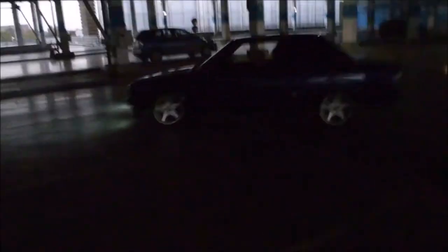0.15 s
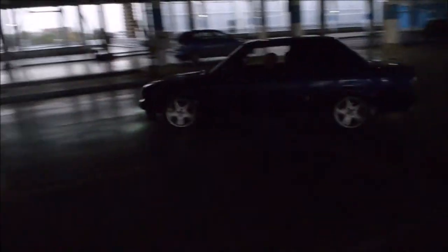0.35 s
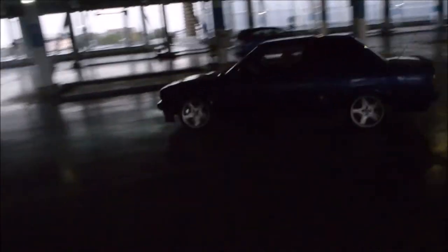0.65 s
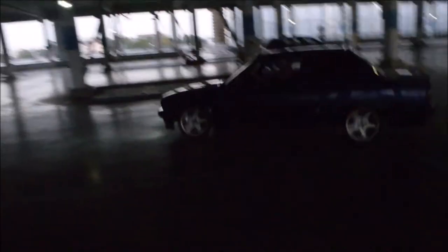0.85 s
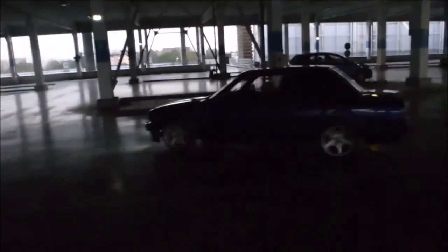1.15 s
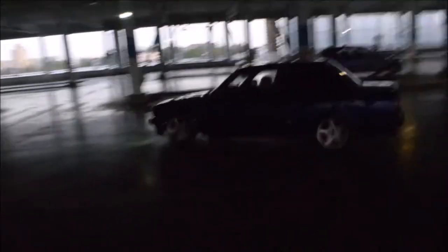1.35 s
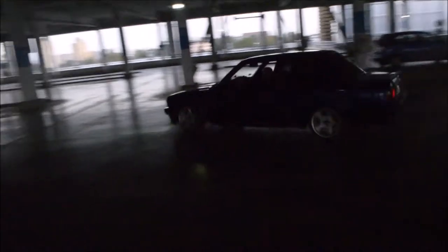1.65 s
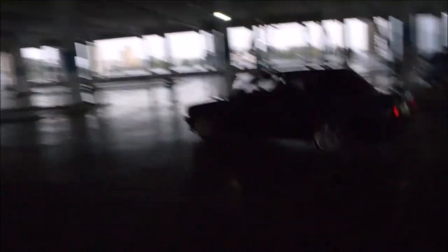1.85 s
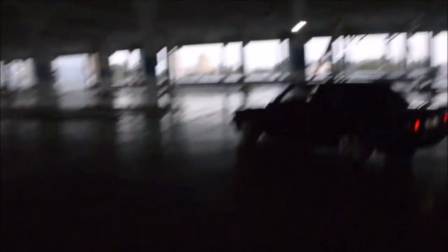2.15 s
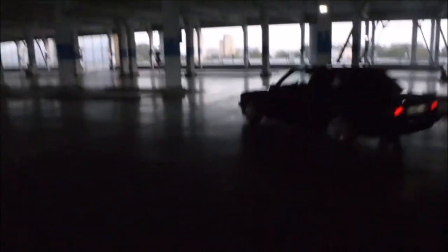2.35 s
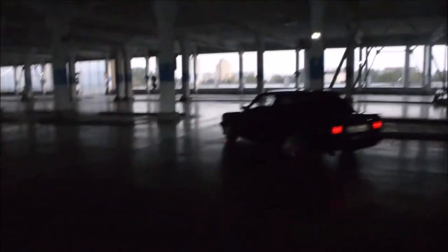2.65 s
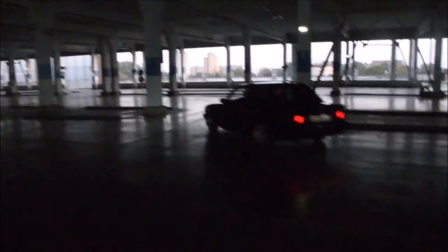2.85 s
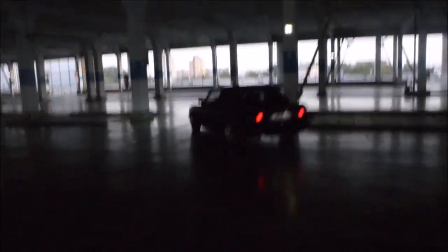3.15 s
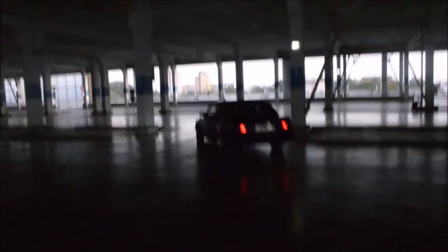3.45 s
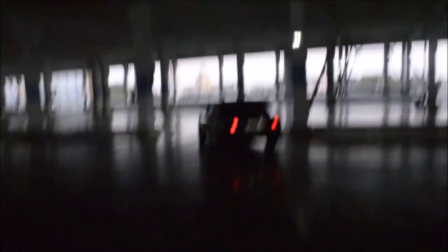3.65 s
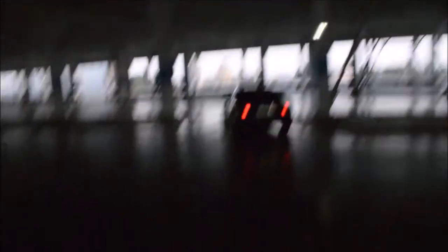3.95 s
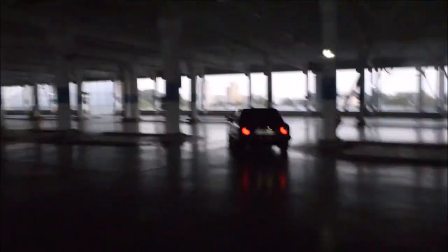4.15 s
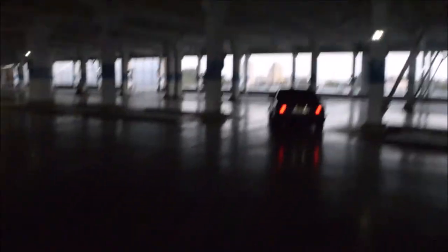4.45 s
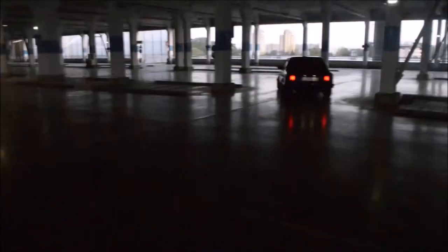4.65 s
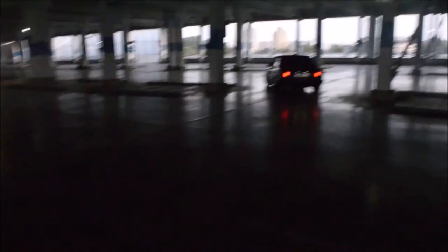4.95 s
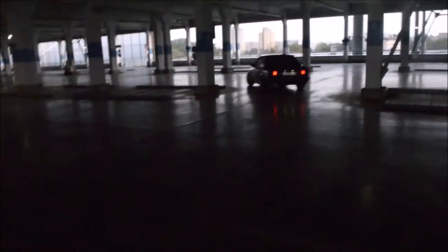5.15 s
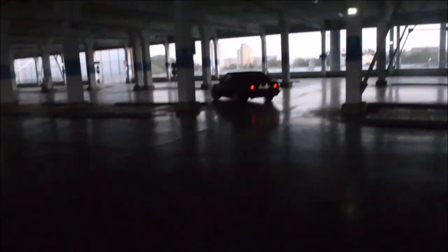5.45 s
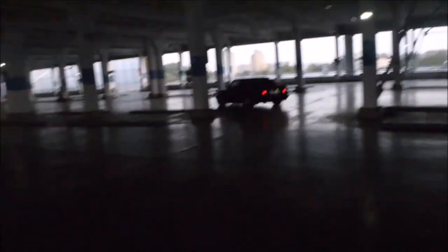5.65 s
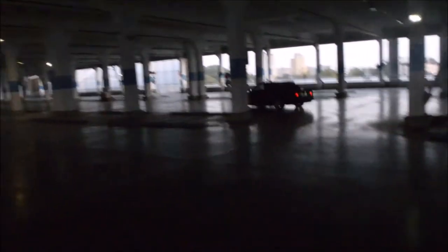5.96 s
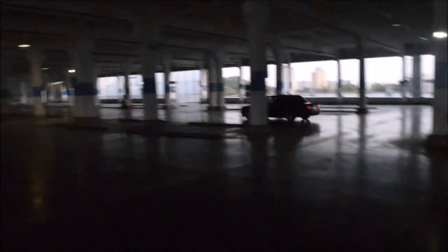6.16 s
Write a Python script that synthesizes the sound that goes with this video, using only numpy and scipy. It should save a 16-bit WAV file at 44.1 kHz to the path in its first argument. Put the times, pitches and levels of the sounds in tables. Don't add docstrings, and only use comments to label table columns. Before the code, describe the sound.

Low uneven engine drone and tyre hiss in a hollow garage, small grit cracks nearby, then a loud rising rev that peaks, dips and holds.

```python
import sys
import numpy as np
from scipy import signal
from scipy.fft import rfft, irfft, next_fast_len
from scipy.io import wavfile
from scipy.ndimage import uniform_filter1d, map_coordinates

SR = 44100
rng = np.random.default_rng(int(sys.argv[2]) if len(sys.argv) > 2 else 0)


def makeup_ratio(level_db):
    decades = np.asarray(level_db, float) / 20
    return 10 ** decades


def transcribe(u):
    v = np.clip(np.atleast_2d(u).T, -1, 1)
    q = np.round(v * 32767).astype(np.int16)
    wavfile.write(sys.argv[1], SR, q)


N = 277826
T = np.arange(N) / SR

# (time [s], crank speed [Hz])
CRANK = [(0, 16.7), (.3, 17.2), (.75, 18.2), (1.3, 19.9), (2, 21.35), (3.5, 21.6), (4.3, 23.1), (4.7, 25.7),
         (4.9, 30.2), (5.01, 36.5), (5.2, 55.2), (5.39, 75), (5.46, 89), (5.56, 102), (5.69, 114.3),
         (5.96, 115), (6.075, 99.5), (6.3, 98.5)]
# (time [s], clean drone [dB], gas throb [dB])
EFFORT = [(0, -23.5, -12.5), (.4, -30.5, -27), (.8, -20.5, -18), (1.35, -25.5, -18), (1.9, -22, -23.5),
          (2.7, -24.5, -23.5), (3.3, -24, -25.5), (3.8, -27, -21.5), (4.35, -21.5, -22), (4.68, -8, -16.5),
          (4.88, -13, -12), (5.2, -13, -19), (5.37, -12.5, -15.5), (5.43, -31, -15.5), (5.52, -16.5, -8.5),
          (5.8, -16, -14.5), (6.15, -16.5, -12), (6.3, -17, -13)]
ORDERS = (2, 3, 4, 5, 6, 7, 8, 10)
SHUT_DB = (-20.5, -23.5, -2, -2, 0, 0, -9, -13)
OPEN_DB = (-0.3, -12.5, -5, -16, -21.5, -36, -21, -38)
# (frequency [Hz], level [dB])
SILENCER = [(50, -19.5), (88, -10.5), (104, -2.5), (127, 3), (150, -3.5), (172, -1), (225, -1.65),
            (450, -18.5)]
# (time [s], level [dB], half length [s])
LIFTS = [
    (2.692, 0.5, .07),
    (5.972, -7, 0.016),
    (6.185, -11, 0.05),
]
# (time [s], level [dB], half length [s])
STANDING_WAVES = [
    [(4.55, -12.5, .15), (4.9, 7, 0.11), (5.08, 6, 0.05), (5.3, -2, 0.042), (5.68, 4, 0.084),
     (5.93, 7.5, 0.036), (6.24, 2, .025)],
    [(5.046, 6.04, .07)],
    [(.9, 10, 0.21), (4.47, 10, 0.098), (4.82, 2, 0.046), (5.01, -10.5, 0.017), (5.93, -7.5, 0.055),
     (6.07, -3, 0.029)],
    [(1.35, 4, 0.53), (2.76, -17, 0.065), (3.65, -14, 0.092), (4.02, 8.5, 0.093), (4.66, 4.5, 0.16),
     (4.97, 11, 0.046)],
    [(.6, -10, .2), (1.4, -16, 0.1), (1.95, 2, 0.088), (2.8, -5, .25), (4.15, -13.5, 0.33)],
    [(.1, -5.5, 0.05), (.35, -9, 0.053), (2.02, -12.5, 0.32), (4.2, -14, 0.29)],
    [(1.6, 9.5, 0.13), (2.02, -12, 0.089), (2.43, 5, 0.1), (3.05, -10, 0.063), (3.4, 5.5, 0.15),
     (4.72, 14, 0.14)],
    [(.2, 10, 0.72), (.85, -6.5, 0.22), (2.68, -11, .07), (2.95, 6, 0.073), (3.55, -9.5, .22)],
]
# (frequency [Hz], noise density [dB])
SHUT_PIPE = [(18, -60), (30, -29), (55, -10), (80, -13), (100, -2.5), (125, -2), (150, -6.5), (190, -9),
             (225, -10), (250, -13), (278, -8.5), (320, -18), (370, -21), (450, -30), (800, -31.5),
             (1700, -120)]
# (frequency [Hz], noise density [dB])
OPEN_PIPE = [(18, -67), (30, -32.5), (49, -35), (114, -3.5), (173, 0.5), (211, -2.5), (230, -6.5),
             (280, -11.5), (328, -11.5), (411, -14), (502, -18.5), (900, -21.5), (1170, -52.5),
             (1980, -120)]
# (frequency [Hz], time to fall 60 dB [s])
HALL_DECAY = [(60, 0.94), (300, 1.81), (1500, 0.28), (6000, 0.54)]
# (time [s], roar [dB])
SCRUB = [(0, -30), (.15, -33), (.9, -33.5), (1.27, -31.5), (2.4, -33), (4.5, -34), (4.85, -34.5),
         (4.97, -33.5), (5.25, -38), (5.42, -35), (5.49, -30), (5.55, -29), (6.1, -26), (6.3, -29.5)]
# (frequency [Hz], noise density [dB])
TYRE = [(200, -37), (350, -6), (520, -6.5), (680, -7), (960, -1), (1300, -5.5), (1700, -9), (2000, -10.5),
        (2600, -17), (3300, -24.5), (4200, -36), (6000, -51.5), (9000, -87.5)]
# (frequency [Hz], noise density [dB])
RASP = [(200, -35.5), (350, 10), (480, -6), (670, -1), (1070, -7.5), (1900, -24.5), (3100, -19.5),
        (3700, -42.5), (5500, -39.5), (7000, -43.5), (12000, -66)]
# (frequency [Hz], noise density [dB])
AIR = [(2000, -36.5), (3300, -4), (4200, -8.5), (5200, -13.5), (7000, -18), (9000, -21.5), (12000, -24.5),
       (14000, -35), (15700, -34), (16200, -88)]
# (time [s], level [dB], extra treble [dB], half length [s])
SPRAY = [(.05, 3, -3.5, 0.14), (0.303, -6.5, 8, 0.077), (.72, -1.5, 8, .07), (2.092, 6, -4.5, 0.079),
         (4.05, 2.5, 4.5, .05), (4.454, 1, -11.5, 0.071), (4.627, 10, -5, 0.25), (4.933, 9, -1, .1),
         (5.178, 10, 1.5, 0.16), (5.41, 0, 3, .08), (5.548, -2, 7, .08), (5.948, 5, -7.5, 0.27)]
# (time [s],
# frequency [Hz], width [Hz], level [dB], half length [s])
SQUEAKS = [(2.127, 5200, 150, -60, .015), (3.2, 966, 75, -40, 0.81), (1.18, 1010, 53, -42.5, 0.39),
           (2.85, 1860, 60, -50, 0.27), (4.866, 4480, 130, -51, .008), (4.87, 4500, 120, -55, 0.035),
           (4.96, 197, 9, -21, .04), (.925, 4700, 90, -56, .012), (.15, 4750, 90, -56, .012),
           (0.38, 4750, 90, -64, 0.018), (1.78, 4200, 90, -61, .02), (5.88, 5600, 800, -56, 0.11),
           (6.05, 6100, 900, -62, 0.076), (6.14, 210, 6.3, -14.5, 0.058), (0.43, 219, 14, -31.5, 0.31)]
# (frequency [Hz], level [dB])
WHINE = [(15665, -78.5)]
# (time [s], peak [dB], hollow [dB], treble [dB], time to fall 60 dB [s])
SNAPS = [(0.1615, -22, -15, 4, 0.0047), (0.1658, -10, 10.5, -4, 0.036), (0.175, -17.5, 4, 6, 0.007),
         (0.1772, -2.5, 3, -13, 0.0076), (0.1798, -15.5, 6, -21, 0.045), (0.928, -23.5, -10.5, -30, 0.022),
         (0.9351, -7.5, -5.5, -32, 0.0052), (1.081, -17.5, 3, -19, 0.0054), (4.574, -27, -6, -2, 0.0048),
         (5.179, -29, 8, 2, .004), (5.209, -40, -10.5, -1, 0.0048)]
# (time [s], frequency [Hz], level [dB], time to fall 60 dB [s])
TINKLE = [
    (.184, 3408, -37, 0.37),
    (.168, 6720, -50, 0.2),
    (0.148, 4800, -50, 0.089),
]
# (frequency [Hz], width [Hz], level [dB])
HOLLOW = [(547, 230, -4), (1230, 170, 7)]
# (frequency [Hz], width [Hz], level [dB])
SHELL = [(2630, 930, 3.5), (3560, 2300, -10)]
# (frequency [Hz], width [Hz], level [dB])
GRIT_EDGE = [(6800, 2000, -4), (10000, 3000, -13)]
HOLES = [.07, .152, .349, .39, .925, 1.24, 1.327, 1.751, 1.761, 1.771, 1.841, 2.029, 2.204, 2.329, 2.522,
         2.585, 2.841, 3.399, 3.569, 3.907, 3.952, 3.993, 4.422, 4.655, 4.85, 5.059, 5.51, 6.193]
# (time [s], peak [dB])
TICKS = [(4.6747, -60), (4.6773, -55), (4.9698, -50.5), (4.9973, -49), (5.022, -54.5), (5.1215, -51),
         (5.197, -51.5), (5.2789, -55), (5.3516, -53.5), (5.5716, -46.5), (5.751, -49.5)]

OPENS_S, OPENING_S = 4.33, 0.1
TAIL_ON_S, TAIL_OFF_S, TURN_S, TAIL_DB = 1.7, 3.65, 0.25, 9
FADE_SHUT_DB, FADE_OPEN_DB = 1.5, 2
UNEVEN_SHUT, UNEVEN_OPEN = 0.13, 0.23
RASP_SHUT_DB, RASP_OPEN_DB = -6.5, 0.5
HISS_DB, HISS_FOLLOWS = -62, 0.99
NEAR_HISS_DB, NEAR_TREBLE_DB, TREBLE_DB, RECEDE_S = 1, 8.5, -0.5, 1.1
HOLE_DB, HOLE_S = -19, 0.007
KEPT_HZ, KEPT_WIDTH_HZ = 4750, 170


def unit(x):
    return x / np.sqrt(np.mean(x ** 2) + 1e-20)


def along(points, hz):
    f, v = np.transpose(points)
    return np.interp(np.log(hz + 1), np.log(f + 1), v)


def curves(rows):
    s, *cols = np.transpose(rows)
    return [np.interp(T, s, c) for c in cols]


def ramp(start, length):
    return np.clip((T - start) / length, 0, 1)


def bump(s, half):
    return np.exp(-((T - s) / half) ** 2)


def bumps_db(rows, column=1):
    return sum(row[column] * bump(row[0], row[-1]) for row in rows)


def wobble(rate):
    return map_coordinates(rng.standard_normal(int(N * rate / SR) + 4), [T * rate])


def filtered(x, response):
    m = next_fast_len(N + SR // 2)
    return irfft(rfft(x, m) * response(np.fft.rfftfreq(m, 1 / SR)), m)[:N]


def highpassed(x, corner_hz, steepness):
    return filtered(x, lambda hz: 1 / (1 + (corner_hz / (hz + 1)) ** steepness))


def coloured(x, spectrum):
    return unit(filtered(x, lambda hz: makeup_ratio(along(spectrum, hz))))


def rush(patchy_db):
    z = signal.stft(rng.standard_normal(N + 512), nperseg=512)[2]
    field = uniform_filter1d(rng.standard_normal(z.shape), size=5, axis=0)
    field = uniform_filter1d(field, size=10, axis=1)
    return signal.istft(z * makeup_ratio(patchy_db * unit(field)), nperseg=512)[1][:N]


def resonate(x, modes):
    top = modes[-1][0] * 0.93

    def body(f):
        total = 0
        for k, (centre, width, db) in enumerate(modes):
            mode = 1j * f * width / (centre * centre - f * f + 1j * f * width)
            total = total + (-1) ** k * makeup_ratio(db) * mode
        return total

    return filtered(x, lambda f: body(f) / (1 + 1j * f / top) ** 2)


def crank_turns():
    return np.cumsum(curves(CRANK)[0]) / SR


def order(turns, count, level_db, shake):
    phase = 2 * np.pi * count * turns + shake * wobble(14) + rng.uniform(0, 2 * np.pi)
    return np.sqrt(2) * makeup_ratio(level_db) * np.sin(phase)


def drone(turns):
    crank = curves(CRANK)[0]
    opened = ramp(OPENS_S, OPENING_S)
    load_db = curves(EFFORT)[0] + bumps_db(LIFTS)
    tail_db = TAIL_DB * (ramp(TAIL_ON_S, TURN_S) - ramp(TAIL_OFF_S, TURN_S))
    fade_db = FADE_SHUT_DB + (FADE_OPEN_DB - FADE_SHUT_DB) * opened
    out = 0
    for k, shut_db, open_db, swells in zip(ORDERS, SHUT_DB, OPEN_DB, STANDING_WAVES):
        share_db = shut_db + (open_db - shut_db) * opened
        level_db = load_db + share_db + along(SILENCER, k * crank) + fade_db * wobble(9)
        level_db = level_db + tail_db * (k >= ORDERS[-2]) + bumps_db(swells)
        out = out + order(turns, k, level_db, shake=0.3)
    return out


def throb(turns):
    level_db = curves(EFFORT)[1]
    uneven = UNEVEN_SHUT + (UNEVEN_OPEN - UNEVEN_SHUT) * ramp(OPENS_S, OPENING_S)
    throttle = ramp(4.9, 0.49)
    at = np.searchsorted(turns, np.arange(1, 2 * turns[-1]) / 2)
    weakness = np.resize([0.006, 0.36, 0.46, 0.62], len(at))
    cylinder = 1 - (1 - 0.5 * throttle[at]) * weakness
    regular = np.bincount(at, cylinder, N)
    density = np.sqrt(uniform_filter1d(regular ** 2, size=SR // 3) + 1e-9)
    upper = highpassed(regular / density, 240, 10)
    scatter = np.bincount(at, 3 * uneven[at] * rng.standard_normal(len(at)), N) / density
    gas = 0.89 * upper + scatter + (0.62 + 0.57 * throttle) * rng.standard_normal(N)
    shut_voice = np.sqrt(1 - throttle) * coloured(gas, SHUT_PIPE)
    open_voice = np.sqrt(throttle) * coloured(gas, OPEN_PIPE)
    return makeup_ratio(level_db - 4.5) * (shut_voice + open_voice)


def hall(x):
    hz, t, z = signal.stft(rng.standard_normal(2 * SR), SR, nperseg=512)
    decay = makeup_ratio(-60 * t / along(HALL_DECAY, hz)[:, None])
    tail = signal.istft(z * decay, SR, nperseg=512)[1]
    return signal.fftconvolve(x, tail / np.linalg.norm(tail))[:N]


def tyre_roar(roar_db, swell):
    return makeup_ratio(roar_db + 0.5 * swell + 0.46 * wobble(18)) * coloured(rush(patchy_db=0.68), TYRE)


def engine_rasp(turns, roar_db, swell):
    rasp_db = RASP_SHUT_DB + (RASP_OPEN_DB - RASP_SHUT_DB) * ramp(4.7, 0.28)
    gate = 1 + 0.6 * np.cos(4 * np.pi * turns)
    return makeup_ratio(roar_db + rasp_db + 0.5 * swell) * coloured(gate * rush(patchy_db=2.0), RASP)


def tread_hiss(roar_db, swell):
    near = np.exp(-T / RECEDE_S)
    hiss_db = HISS_DB + HISS_FOLLOWS * (roar_db + 33.5) + NEAR_HISS_DB * near + bumps_db(SPRAY)
    treble_db = TREBLE_DB + NEAR_TREBLE_DB * near + bumps_db(SPRAY, column=2)
    air = coloured(rush(patchy_db=0.4), AIR)
    top = highpassed(air, 7500, 4)
    return makeup_ratio(hiss_db + 0.5 * swell + 1.7 * wobble(20)) * (air + (makeup_ratio(treble_db) - 1) * top)


def squeaks():
    out = 0
    for s, hz, width, db, half in SQUEAKS:
        narrow = unit(filtered(rng.standard_normal(N), lambda f: np.exp(-((f - hz) / width) ** 2)))
        out = out + makeup_ratio(db) * bump(s, half) * narrow
    return out


def rolling(turns):
    roar_db, swell = curves(SCRUB)[0], wobble(6)
    return tyre_roar(roar_db, swell) + engine_rasp(turns, roar_db, swell) + tread_hiss(roar_db, swell) + squeaks()


def lamp():
    (hz, db), = WHINE
    away = np.clip(2 * np.abs(T - 3.6) - 2.2, 0, 1)
    return makeup_ratio(db + 5.0 - 10 * away + 1.5 * wobble(4)) * np.sin(2 * np.pi * hz * T)


def snaps():
    drive, t = np.zeros((3, N + SR)), T[:SR // 8]
    for s, db, hollow_db, treble_db, life in SNAPS:
        burst = 0.45 * rng.standard_normal(len(t)) - 0.02 / life * (t == 0)
        crack = makeup_ratio(db - 60 * t / life) * burst
        mix = np.array([makeup_ratio(hollow_db) * crack, crack, makeup_ratio(treble_db - 60 * t / 0.004) * crack])
        start = round(s * SR)
        drive[:, start:start + len(t)] += mix
    hollow, shell, edge = drive[:, :N]
    out = makeup_ratio(12.5) * resonate(hollow, HOLLOW) + makeup_ratio(12.5) * resonate(shell, SHELL)
    out = out + makeup_ratio(-20) * resonate(edge, GRIT_EDGE)
    for s, hz, db, t60 in TINKLE:
        age = np.clip(T - s, 0, 1)
        out = out + makeup_ratio(db - 60 * age / t60) * np.sin(2 * np.pi * hz * age) * (age < 1)
    return out


def scene():
    turns = crank_turns()
    lines, pulses, cracks = drone(turns), throb(turns), snaps()
    echo = hall(makeup_ratio(-13.5 - 0.9 * (T > 4.9)) * lines + makeup_ratio(-6.0) * pulses + makeup_ratio(-32.5) * cracks)
    return (lines + makeup_ratio(-6.5) * pulses + echo + rolling(turns) + cracks + lamp())[None]


def band_limit(x):
    return signal.sosfilt(signal.butter(12, 15830, fs=SR, output="sos"), x)


def record(dry):
    treble = highpassed(dry[0], 3900, 20)
    kept = filtered(treble, lambda hz: np.exp(-((hz - KEPT_HZ) / KEPT_WIDTH_HZ) ** 4))
    treble = treble - (T < 2) * kept
    keep = makeup_ratio(sum(HOLE_DB * bump(s, HOLE_S) for s in HOLES))
    x = (dry - (1 - keep) * treble) * (1 - ramp(T[-1] - 0.006, 0.006))
    x = x / (1 + np.abs(x / 0.95) ** 5) ** (1 / 5)
    at, db = np.transpose(TICKS)
    ticks = np.bincount((at * SR).astype(int) + 30, makeup_ratio(db + 13), N)
    return band_limit(x + highpassed(ticks, 8000, 6))


dry = scene()
out = record(dry)
transcribe(out)
```